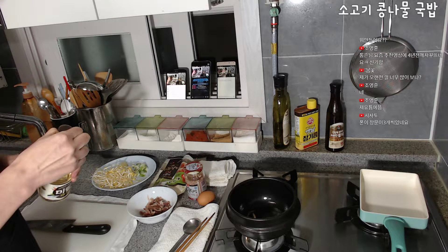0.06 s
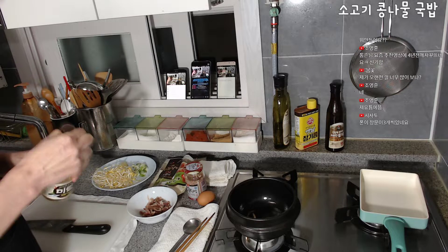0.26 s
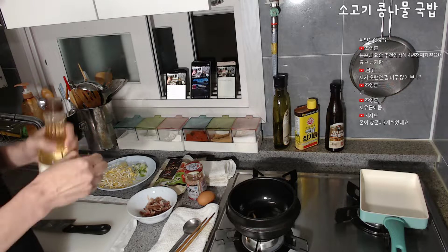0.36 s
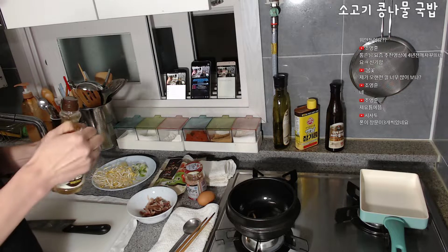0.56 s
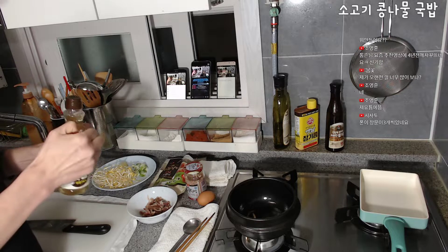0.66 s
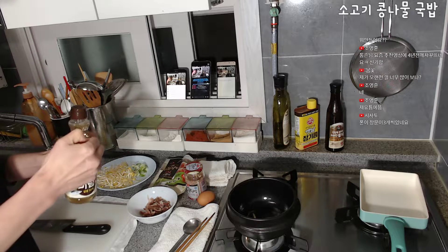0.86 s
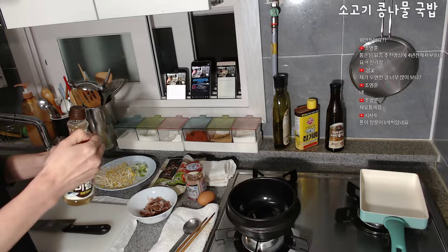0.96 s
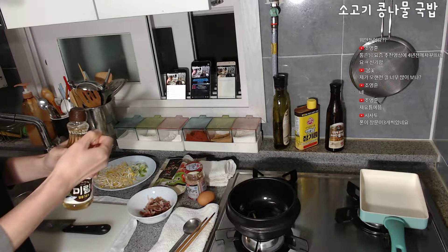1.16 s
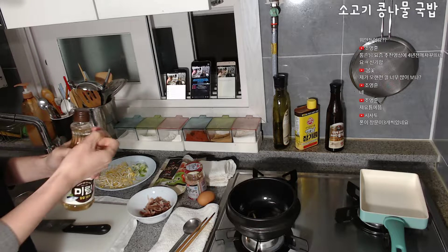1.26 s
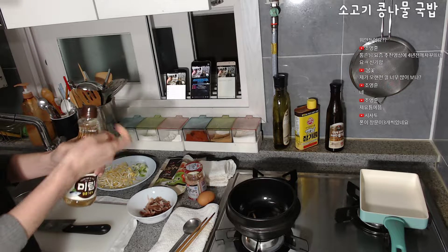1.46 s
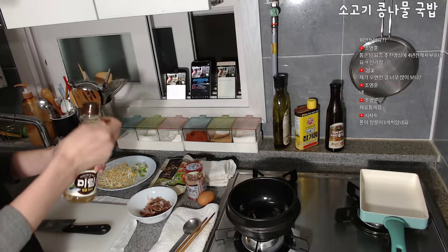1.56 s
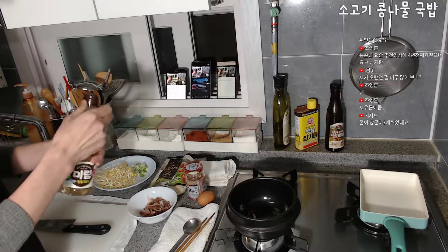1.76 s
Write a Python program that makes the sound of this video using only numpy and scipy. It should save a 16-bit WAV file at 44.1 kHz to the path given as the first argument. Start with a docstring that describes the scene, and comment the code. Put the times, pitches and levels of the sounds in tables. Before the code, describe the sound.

Twisting plastic cap ticks, tears its seal sharply, then rubs and snaps three times over faint room hum

```python
"""A hand twists a plastic bottle cap in a small tiled kitchen: fine ticks, a creak, then the seal tears in one
loud rip of snaps that overloads the microphone; later the cap rubs and clicks home three times. Each snap rings
damped modes of the cap and knocks the hollow bottle. Something small bounces softly further off, as duller
struck modes. Wall echoes and a noise tail make the room; filtered noise and wavering tones lie underneath."""
import sys
import numpy as np
from scipy import signal
from scipy.fft import rfft, irfft, next_fast_len
from scipy.io import wavfile
from scipy.ndimage import map_coordinates

SR = 44100
rng = np.random.default_rng(int(sys.argv[2]) if len(sys.argv) > 2 else 0)


def wav_record(signal):
    """Record a signal, one row per channel, as 16-bit PCM in the file named by sys.argv[1]."""
    frames = np.transpose(np.atleast_2d(signal))
    bounded = np.clip(frames, -1, 1)
    # unit amplitude maps onto the largest positive 16-bit level
    quanta = np.round(bounded * 32767).astype(np.int16)
    wavfile.write(sys.argv[1], SR, quanta)


N = 79380  # 1.8 s

MODE_DRIFT = 0.069  # random shift of struck modes from blow to blow, as a share of their frequency
CONTACT_S = .00004  # time constant of a blow's onset


def amp(db):
    """Decibels to linear amplitude."""
    return 10 ** (np.asarray(db) / 20)


def unit(x):
    """Scale to an RMS of one."""
    return x / np.sqrt(np.mean(x ** 2) + 1e-20)


def along(points, hz):
    """Read (Hz, value) points on a logarithmic frequency axis."""
    point_hz, value = np.transpose(points)
    return np.interp(np.log(hz + 1), np.log(point_hz + 1), value)


def curve(rows):
    """Draw straight lines through (seconds, value) rows, one value per sample."""
    return np.interp(np.arange(N) / SR, *np.transpose(rows))


def wobble(rate):
    """A smooth random curve through rate random knots a second."""
    knots = rng.standard_normal(int(N * rate / SR) + 4)
    return map_coordinates(knots, [np.arange(N) * rate / SR])


def filtered(x, response):
    """Multiply the spectrum of x by a response that is a function of frequency in Hz."""
    size = next_fast_len(N + SR // 2)
    spectrum = rfft(x, size) * response(np.fft.rfftfreq(size, 1 / SR))
    return irfft(spectrum, size)[..., :N]


def rings(times, peak_db, hz, mode_db, t60, low_hz, size):
    """Damped modes struck at each time, one row of mode levels per blow; small things radiate no bass."""
    t = np.arange(size) / SR
    shifted_hz = hz * (1 + MODE_DRIFT * rng.standard_normal(mode_db.shape))
    decay = amp(mode_db[..., None] - 60 * t / t60[:, None])
    blows = np.sum(decay * np.sin(2 * np.pi * shifted_hz[..., None] * t), axis=1)
    blows = blows * (1 - np.exp(-t / CONTACT_S))
    # three second-order high-passes in a row take the bass away
    u = 1j * np.fft.rfftfreq(2 * size, 1 / SR) / np.asarray(low_hz)[:, None]
    high_pass = (u * u / (1 + np.sqrt(2) * u + u * u)) ** 3
    blows = irfft(rfft(blows, 2 * size) * high_pass)
    blows *= (amp(peak_db) / np.abs(blows).max(axis=1))[:, None]
    # add every blow into the timeline at its own start
    first = np.round(np.asarray(times) * SR).astype(int)[:, None]
    at = first + np.arange(2 * size)
    return np.bincount(at.ravel(), blows.ravel(), N + SR)[:N]


def room_air():
    """Steady noise with a shaped spectrum, whose low part alone sways in level."""
    # Each row: frequency in Hz, relative noise density in dB per Hz.
    air_colour = [(41, -50.5), (70, -2), (148, -8), (208, -4.5), (268, 0.5), (649, -8), (744, -7),
                  (1610, -20), (1850, -20.5), (2780, -24), (16000, -40.5)]
    # Each row: time in seconds, level in dB.
    air_level = [(0.0, -49.5), (0.24, -49), (1.168, -48.5), (1.8, -49.5)]
    sway_db, sway_top_hz = 1.5, 1314
    air = unit(filtered(rng.standard_normal(N), lambda hz: amp(along(air_colour, hz))))
    low = filtered(air, lambda hz: 1 / (1 + (hz / sway_top_hz) ** 4))
    air = air + (amp(sway_db * wobble(20)) - 1) * low
    return amp(curve(air_level)) * air


def low_hum():
    """A low sine whose pitch wanders and whose level rises and falls."""
    # Each row: time in seconds, level in dB.
    hum_level = [(0.0, -73), (0.014, -48.5), (0.656, -49), (0.722, -41.5), (0.826, -47), (0.866, -42),
                 (1.202, -51), (1.222, -42.5), (1.292, -42.5), (1.378, -56), (1.454, -46.5), (1.564, -43),
                 (1.764, -46), (1.8, -47)]
    centre_hz, wander_hz = 42, 3
    pitch_hz = centre_hz + wander_hz * wobble(16)
    hum = np.sqrt(2) * np.sin(2 * np.pi * np.cumsum(pitch_hz) / SR)
    return amp(curve(hum_level)) * hum


def low_rumble():
    """Noise held mostly below 60 Hz that swells for a while."""
    # Each row: time in seconds, level in dB.
    rumble_level = [(0, -62), (.3, -57.5), (.66, -57.5), (.72, -49.5), (1.05, -46.5), (1.3, -59),
                    (1.8, -61.5)]
    rumble = unit(filtered(rng.standard_normal(N), lambda hz: hz / (1 + (hz / 60) ** 8)))
    return amp(curve(rumble_level)) * rumble


def mains_tone():
    """A faint steady-pitched sine at 120 Hz with a slightly unsteady level."""
    level_db = -61 + 2 * wobble(11)
    return amp(level_db) * np.sin(2 * np.pi * 120 * np.arange(N) / SR)


def background():
    """Room noise, a low wavering hum, a rumble and a mains tone sound together."""
    return room_air() + low_hum() + low_rumble() + mains_tone()


def kitchen(x):
    """Near walls return echoes, then a diffuse tail decays, drawn anew for each stretch of time."""
    # Each row: echo delay in seconds, level in dB.
    walls = [(.0028, -12.5), (.0036, -14), (.0042, -6.5), (.0048, -17.5), (.0053, -6), (.0058, -7.5),
             (.0066, -13.5), (0.012, -12), (0.0145, -11), (.021, -20)]
    # Each row: frequency in Hz, time for the tail to fall 60 dB in seconds.
    tail_decay = [(300, 0.27), (790, 0.35), (2090, 0.36), (5510, 0.39), (14600, 0.21)]
    tail_db, tail_start_s = -1.5, .0015
    out = np.zeros(N)
    for start in range(0, N, 4096):
        # noise whose bands die away at their own rates
        hz, t, noise = signal.stft(rng.standard_normal(SR // 2), SR, nperseg=128)
        fade = amp(-60 * t / along(tail_decay, hz)[:, None])
        tail = signal.istft(noise * fade, SR, nperseg=128)[1]
        tail = amp(tail_db) * tail / np.linalg.norm(tail)
        response = np.pad(tail, (round(tail_start_s * SR), 0))
        for delay, db in walls:
            response[round(delay * SR)] += amp(db + rng.normal(0, 1.5)) * rng.choice([-1, 1])
        wet = signal.fftconvolve(x[start:start + 4096], response)[:N - start]
        out[start:start + len(wet)] += wet
    return out


def bounces():
    """A small far object bounces: soft contacts strike dull modes, mostly closer and weaker each time."""
    # Each row: start in seconds, peak in dB before the low-pass and the mix.
    taps_at = [(0.6988, -37), (0.7996, -37.5), (0.8804, -37), (0.9477, -41.5), (1.0251, -45), (1.0694, -66)]
    # Each row: mode frequency in Hz, level in dB, time to fall 60 dB in seconds.
    object_modes = [(1700, -2, .004), (2100, 0, .004), (2500, -2, .004), (2900, 0, .004), (3400, -3, .004),
                    (3900, -8, .004)]
    top_hz = 3570  # soft contact: little above this
    times, peak_db = np.transpose(taps_at)
    hz, level, t60 = np.transpose(object_modes)
    mode_db = level + 1.7 * rng.standard_normal((len(times), len(hz)))
    taps = rings(times, peak_db, hz, mode_db, t60, 1150 + 0 * times, size=400)
    # two second-order low-passes in a row
    return filtered(taps, lambda f: 1 / (1 + np.sqrt(2) * 1j * f / top_hz - (f / top_hz) ** 2) ** 2)


def bottle(push):
    """The hollow body answers a push with a few broad resonances."""
    # Each row: resonance in Hz, width in Hz, level in dB.
    body = [(208.3, 68, -9), (477, 66, -5), (929, 200, -3.5), (1474, 280, 3.5), (2121, 660, -4)]

    def response(f):
        total = 0
        for k, (centre, width, db) in enumerate(body):
            resonance = 1j * f * width / (centre * centre - f * f + 1j * f * width)
            total = total + (-1) ** k * amp(db) * resonance  # neighbours have opposite sign
        return total

    return filtered(push, response)


def snaps(times, peak_db, centre_hz, spread, low_hz):
    """Each snap rings the cap's modes nearest its centre, a little differently, and knocks the bottle."""
    # Each row: mode frequency in Hz, time to fall 60 dB in seconds.
    cap_modes = [(1500, 0.0053), (2500, .003), (3500, 0.0028), (4650, 0.003), (5600, 0.0026),
                 (6600, 0.0052), (7800, 0.003), (9500, 0.0027), (10800, .002), (12200, 0.00069),
                 (13600, .0015)]
    # push on the body for a snap heard from 3 kHz up; finer snaps push less
    knock_db, knock_db_per_octave = -5, -6.5
    hz, t60 = np.transpose(cap_modes)
    away = np.log2(hz / centre_hz[:, None]) / spread[:, None]
    mode_db = -6 * away ** 2 + 2 * rng.standard_normal(away.shape)
    ring = rings(times, peak_db, hz, mode_db, t60, low_hz, size=260)
    push = amp(peak_db + knock_db + knock_db_per_octave * np.log2(low_hz / 3000))
    push = push * rng.choice([-1, 1], len(times))
    knocks = np.bincount(np.round(times * SR).astype(int), push, N)[:N]
    return ring + bottle(knocks)


def cap():
    """Stick and slip of the cap: single clicks, and runs of irregular snaps while plastic tears or rubs."""
    # Each row: start in seconds, ring peak in dB, centre in Hz, spread in octaves, lowest heard in Hz.
    clicks = [(.0115, -47, 9700, 0.42, 7010), (.0335, -50, 12600, 0.55, 8760),
              (.0460, -35, 10600, 0.44, 7000), (0.106, -40.5, 12000, 0.32, 9500),
              (.1335, -35, 11000, 0.55, 9000), (0.1813, -31.5, 11400, 0.77, 6000),
              (0.1922, -14, 7900, .45, 2560), (0.2268, -18.5, 12870, 0.37, 9500),
              (0.2272, -8.5, 7700, 0.54, 6000), (0.2317, 6.5, 8530, 0.24, 2500),
              (0.743, -52, 10750, 0.48, 7730), (0.9674, -41.5, 7000, 0.51, 3140),
              (1.0849, -49.5, 8690, 0.65, 6520), (1.170, -59.5, 7500, 0.23, 6180),
              (1.193, -49, 6790, 0.35, 5060), (1.245, -57.5, 10200, .6, 6364),
              (1.2527, -37.5, 6400, 1.7, 1760), (1.2919, -29.5, 6320, 1.2, 1776),
              (1.398, -38.5, 8280, 0.53, 4470), (1.4253, -26, 8990, 0.93, 2270),
              (1.446, -29, 4440, 0.59, 2300), (1.4617, -7.5, 5580, 1.1, 2793),
              (1.4852, -7.5, 6000, 0.52, 2986), (1.5724, -11.5, 4380, 0.54, 2808),
              (1.766, -50.5, 10460, .5, 7020)]
    # Each row: start in seconds, length in seconds, level at start in dB, level at end in dB,
    # snaps per second, centre in Hz, spread in octaves, lowest heard in Hz.
    snap_runs = [(.204, .026, -36, -25, 330, 8000, .3, 5000), (.2328, .04, -6, -6, 1300, 5800, 1.1, 1200),
                 (1.287, .035, -48, -52, 450, 5000, 1.1, 1700), (1.375, .02, -58, -55, 500, 6000, .6, 4000),
                 (1.4225, .036, -41, -43, 350, 6500, 1.1, 2200)]
    scatter_db = 5  # each snap lies up to this far above or below the run's level
    out = snaps(*np.transpose(clicks))
    for start, length, from_db, to_db, rate, *colour in snap_runs:
        draw = rng.random((120, 2))
        t = (np.cumsum(.3 + 1.4 * draw[:, 0]) - 1) / rate
        level = from_db + (to_db - from_db) * t / length
        level = level + scatter_db * (2 * draw[:, 1] - 1)
        level = level - 200 * (t > length)  # silence snaps past the end of the run
        out = out + snaps(start + np.clip(t, 0, length), level, *np.outer(colour, np.ones_like(t)))
    return out


def scene():
    """Cap and bounces sound directly and through the room; one microphone feeds both channels."""
    bounce_direct_db, bounce_room_db = -1, 4.5  # the far object is more room than direct sound
    near, far = cap(), bounces()
    direct = near + amp(bounce_direct_db) * far
    room = kitchen(near + amp(bounce_room_db) * far)
    sound = direct + room + background()
    return np.array([sound, sound])


def record(dry):
    """The microphone dulls the top, peaks are clipped, then nothing passes above the band limit."""
    # Each row: frequency in Hz, treble response in dB.
    mic_response = [(10000, 0), (16000, -3.5)]
    ceiling, hardness, top_hz = .93, 6, 16100  # clip amplitude, sharpness of its knee, band limit in Hz
    heard = filtered(dry, lambda hz: amp(along(mic_response, hz)))
    clipped = heard / (1 + np.abs(heard / ceiling) ** hardness) ** (1 / hardness)
    return filtered(clipped, lambda hz: hz < top_hz)


dry = scene()
out = record(dry)
wav_record(out)
```